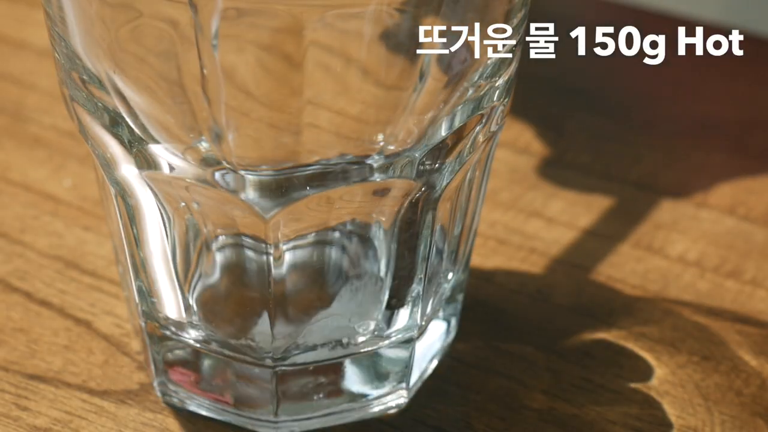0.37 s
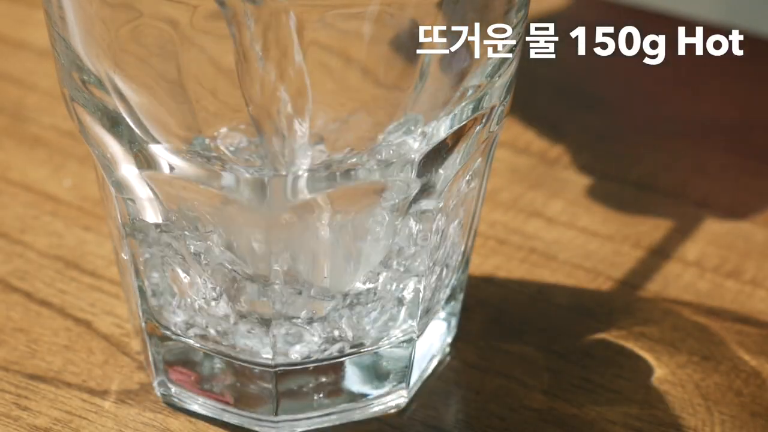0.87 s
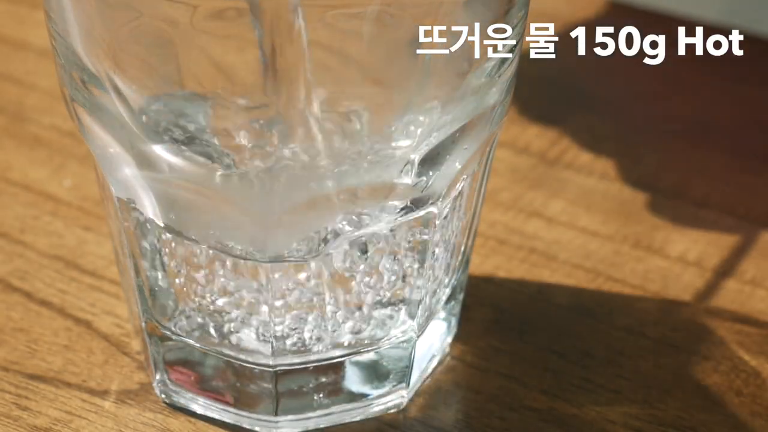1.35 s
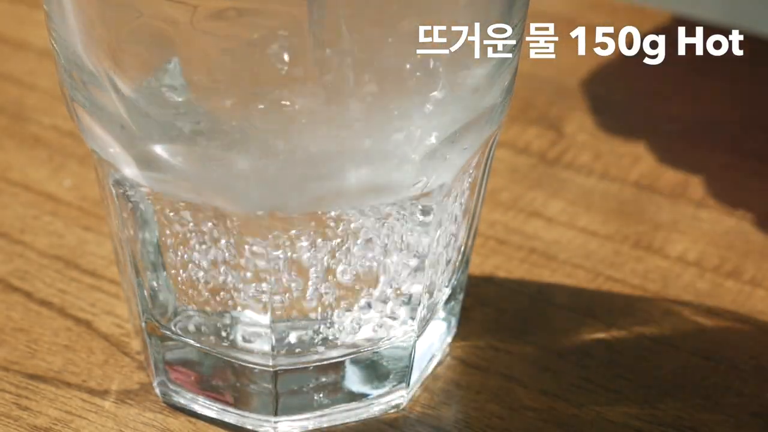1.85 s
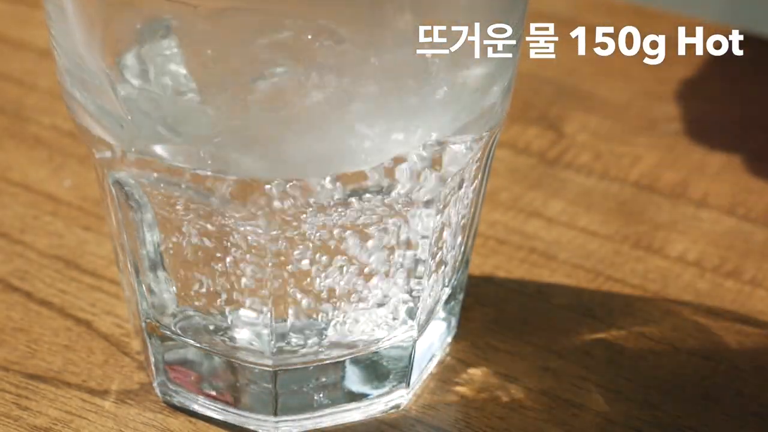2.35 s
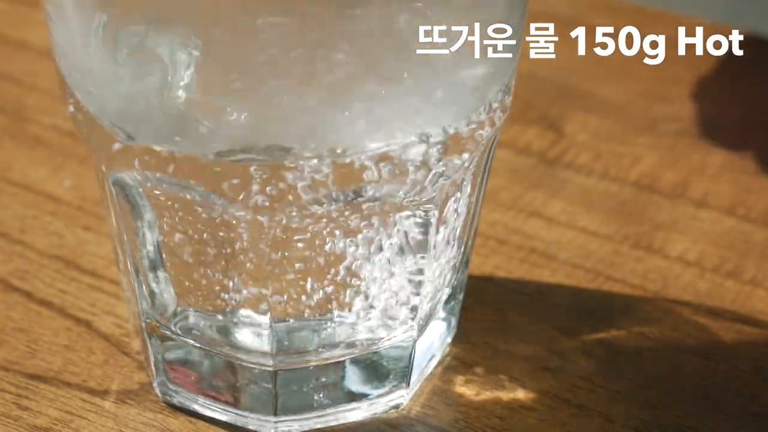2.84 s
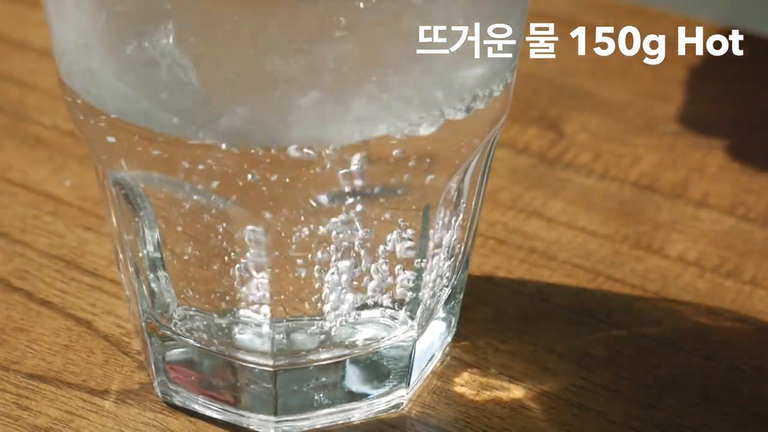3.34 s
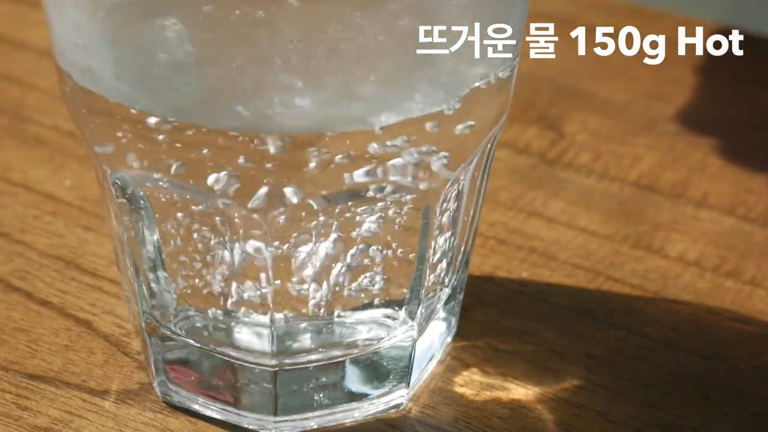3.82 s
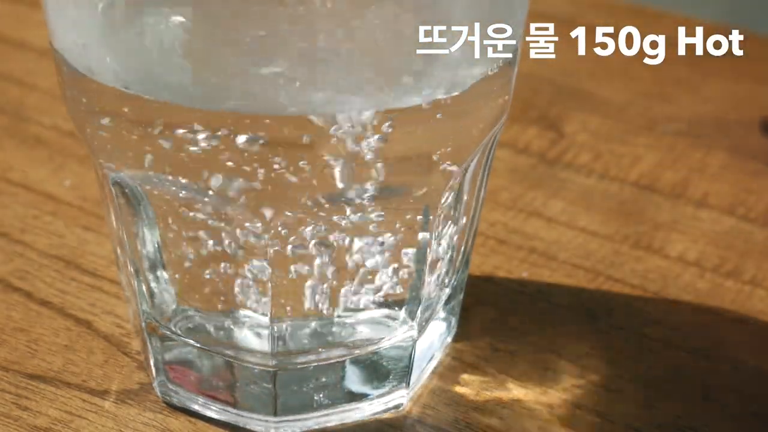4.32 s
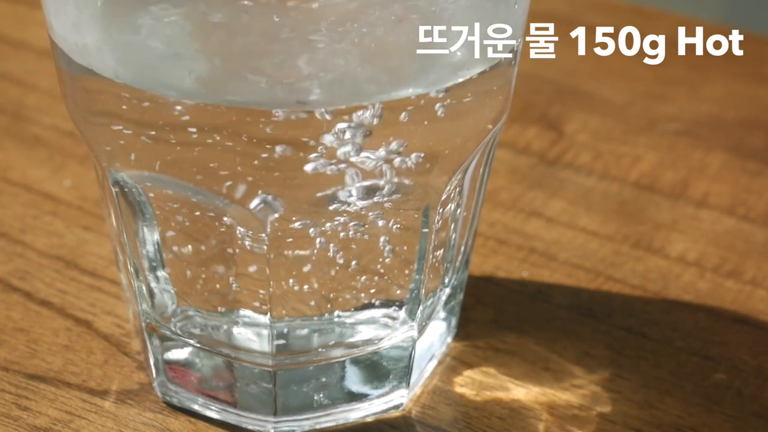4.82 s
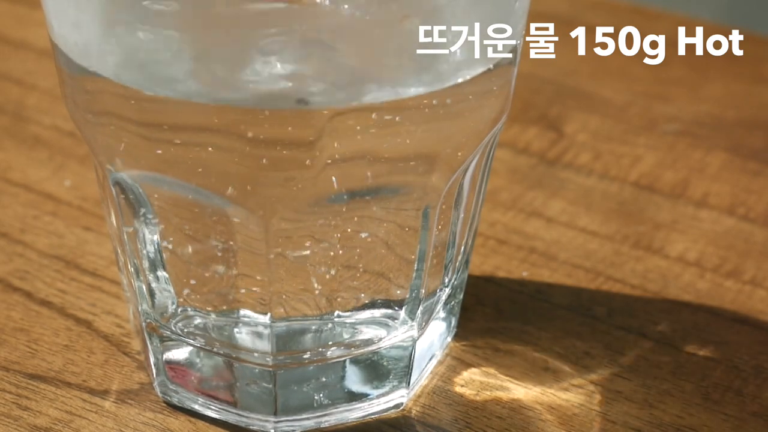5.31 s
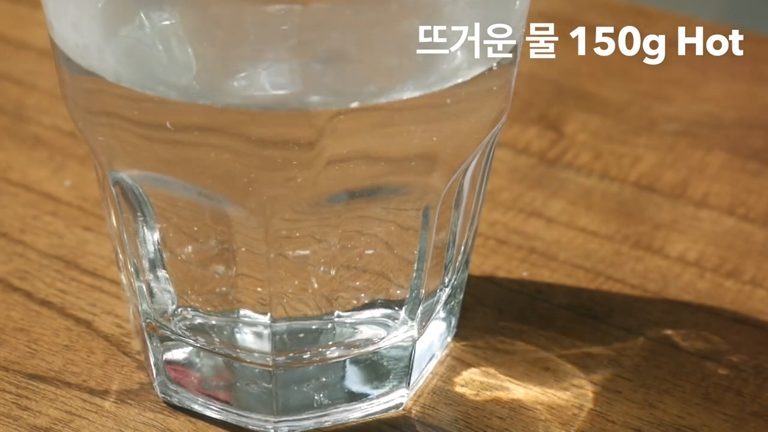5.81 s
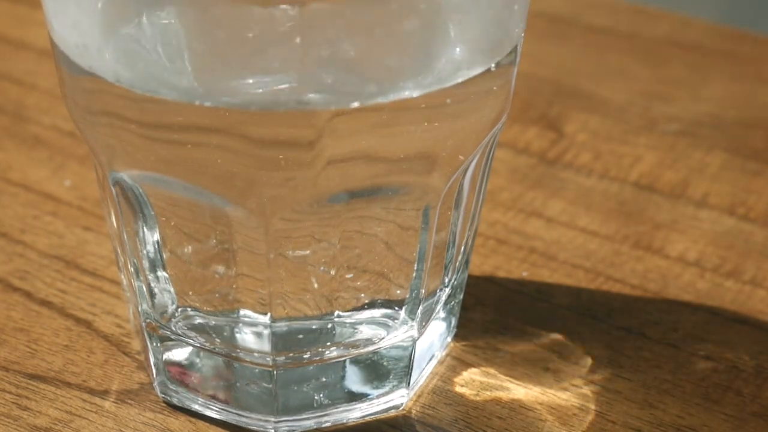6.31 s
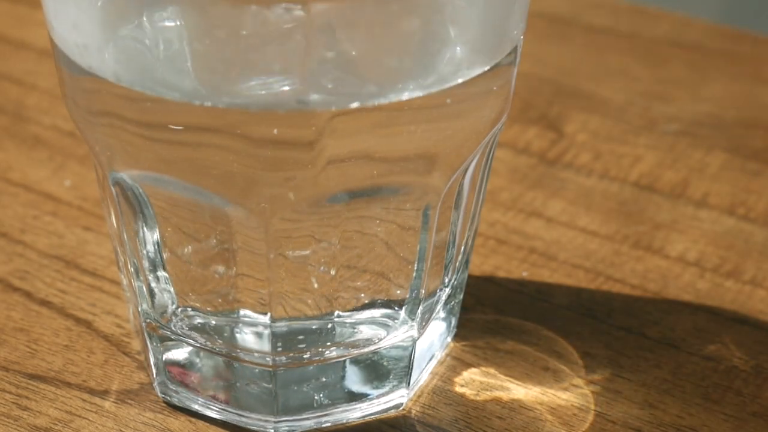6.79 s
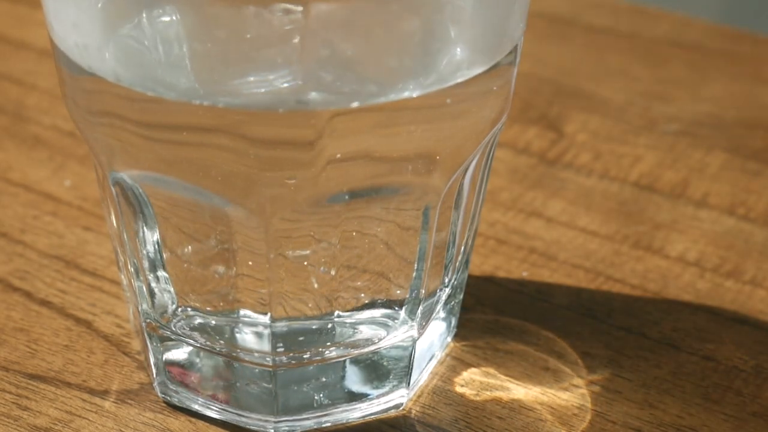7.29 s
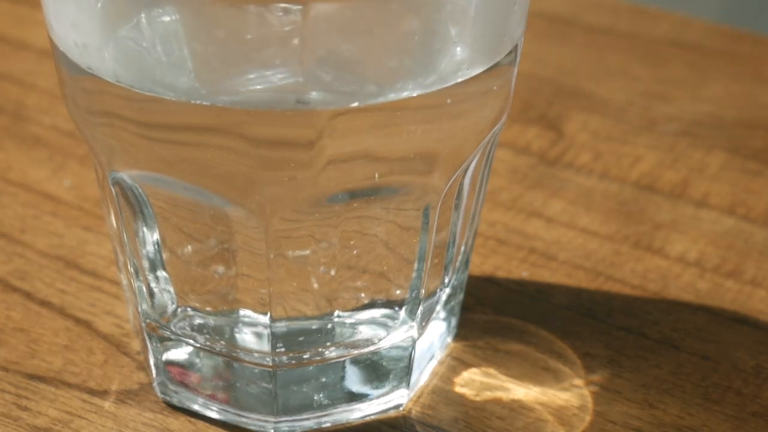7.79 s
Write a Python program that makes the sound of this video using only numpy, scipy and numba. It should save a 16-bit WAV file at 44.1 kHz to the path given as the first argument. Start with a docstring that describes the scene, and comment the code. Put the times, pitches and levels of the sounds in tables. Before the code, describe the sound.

Hot water splashes and glugs into a thick glass tumbler in two close pours, then stops, leaving last fizzing ticks and faint crickets outside.

```python
"""A wooden table near an open window: hot water is poured in two goes into a thick tumbler.
Air pockets glug, bubbles plop, drops and bursting froth tick, each a swelling, dying, gliding sine.
Resonators for table and glass ring along; a short noise tail is the room.
Outside, soft pitched strokes make crickets and a far animal; brief hums sound, and shaped noise is
the air's rumble and hiss."""
import sys
import numpy as np
from scipy import signal
from scipy.fft import rfft, irfft, next_fast_len
from scipy.io import wavfile
from numba import njit

SR = 44100
rng = np.random.default_rng(int(sys.argv[2]) if len(sys.argv) > 2 else 0)


def store_pcm(level_fs):
    """Save levels as 16-bit WAV."""
    pcm = np.round(np.clip(level_fs, -1, 1) * 32767).astype(np.int16)
    wavfile.write(sys.argv[1], SR, np.atleast_2d(pcm).T)


def magnitude_from_level(level_db):
    """Linear magnitude for a level in decibels (20 dB per decade)."""
    exponent = np.asarray(level_db, float) / 20
    return 10 ** exponent


N = 348825  # samples

# Levels are relative: each layer adds its own trim. Pitches are nominal.
# stream strength: t/s, glugging level/dB, bubbling level/dB, spray level/dB
STREAM = [(0.45, -94, -84.5, -77.5), (0.86, -66.5, -33.5, -36), (1.01, -27, -36, -43),
          (1.45, -39.5, -32, -52), (1.8, -58.5, -69, -65.5), (1.91, -36.5, -48, -50),
          (2.01, -45.5, -63.5, -63.5), (2.44, -51, -46.5, -56), (2.51, -20, -30, -33),
          (2.6, -34.5, -38, -43.5), (3.07, -32, -35, -46), (3.45, -53.5, -48, -50), (3.94, -78, -84, -66.5),
          (3.98, -30, -25, -40.5), (4.07, -61.5, -65, -60.5), (4.75, -57, -57, -56.5),
          (4.83, -33, -51.5, -64.5), (5.02, -91.5, -89, -61), (5.9, -85, -91, -85.5)]
# pitches as the glass fills: t/s, big pockets f/Hz, bubbles f/Hz, spray f/Hz, froth above spray level/dB
FILL = [(.5, 1040, 2580, 4860, -2.5), (.97, 1160, 2390, 4800, -18.5), (1.07, 890, 2200, 4730, -21),
        (1.45, 600, 2290, 3940, -20), (1.75, 582, 1645, 4420, -5.5), (2.4, 478, 1696, 5400, -15.5),
        (3.0, 452, 1916, 5550, -6.5), (3.6, 490, 2300, 5100, -10), (4.65, 481, 2290, 4780, -3.5),
        (4.8, 603, 1950, 4100, -5)]
# loud air pockets: t/s, level/dB, f/Hz
GLUGS = [(0.827, -28.5, 1030), (0.92, -29.5, 1070), (1, -24.5, 1160), (1.022, -22, 930),
         (1.046, -24.5, 723), (1.151, -34, 940), (1.168, -29, 1130), (1.202, -25.5, 1170),
         (1.294, -27.5, 895), (1.427, -36, 705), (1.47, -32, 630), (1.508, -30.5, 643), (1.57, -37, 510),
         (1.715, -45.5, 565), (2.144, -38, 510), (2.245, -36.5, 492), (2.28, -40.5, 517), (2.408, -29, 600),
         (2.47, -30.5, 395), (2.506, -16.5, 413), (2.617, -28.5, 385), (2.68, -30, 340), (2.703, -21, 378),
         (2.747, -30, 920), (2.839, -31, 388), (2.877, -31, 360), (2.95, -23.5, 387), (2.984, -26, 394),
         (3.037, -23, 399), (3.088, -26.5, 573), (3.17, -35.5, 365), (3.288, -37.5, 360),
         (3.328, -28.5, 372), (3.339, -35, 570), (3.403, -32.5, 354), (3.573, -36, 380), (3.668, -28, 380),
         (3.731, -36.5, 500), (3.763, -32, 401), (3.95, -37.5, 373), (3.974, -27, 383), (4.141, -46.5, 636),
         (4.17, -42, 517), (4.27, -44.5, 380), (4.358, -36.5, 495), (4.411, -44.5, 470),
         (4.571, -45.5, 360), (4.71, -37.5, 497), (4.773, -30.5, 630), (4.799, -26, 553), (4.875, -36, 650)]
# water knocking on the glass wall: t/s, level/dB
KNOCKS = [(0.829, -29), (1, -37), (1.151, -26.5), (1.203, -35), (2.504, -41), (2.703, -35.5), (2.984, -39),
          (3.668, -34.5), (4.798, -34.5)]
# loud bubbles: t/s, level/dB, f/Hz
PLOPS = [(0.587, -39.5, 2780), (0.596, -36.5, 2670), (0.602, -40.5, 2130), (0.6657, -38, 2930),
         (0.6802, -36.5, 2430), (0.721, -38.5, 2610), (0.7307, -36.5, 2540), (0.753, -32, 2560),
         (0.767, -38.5, 2710), (0.7792, -37.5, 2300), (0.793, -35, 2500), (0.8074, -18.5, 2150),
         (0.819, -34, 1960), (0.8287, -41.5, 2990), (0.851, -37.0, 1850), (0.859, -30, 2520),
         (0.9, -39, 2450), (0.921, -30.5, 2550), (0.93, -33, 2720), (0.9606, -24.5, 2110),
         (0.975, -30.5, 2910), (1.003, -35, 2430), (1.0172, -41, 2320), (1.0556, -36.5, 2070),
         (1.057, -36.5, 1310), (1.103, -35, 2090), (1.1406, -39.5, 1850), (1.1765, -34.5, 2200),
         (1.1764, -33, 1310), (1.184, -34.5, 2240), (1.202, -30.5, 2580), (1.2516, -35.5, 2500),
         (1.2796, -35.5, 2500), (1.2987, -28.5, 2610), (1.3505, -40.5, 1820), (1.397, -45, 2620),
         (1.4244, -48, 2520), (1.4317, -34.5, 2690), (1.4424, -42.5, 2220), (1.464, -36.5, 2560),
         (1.4825, -41.5, 2110), (1.504, -41.5, 1920), (1.5204, -45, 2350), (1.612, -41, 1310),
         (1.824, -54.5, 1850), (1.8954, -46, 1810), (1.9127, -44, 1830), (1.926, -45, 2130),
         (1.934, -47, 2410), (1.9793, -51, 2260), (1.994, -53, 3150), (2.0026, -51, 2350),
         (2.086, -53.5, 2200), (2.1006, -43.5, 2020), (2.142, -45, 1740), (2.15, -44.5, 1680),
         (2.2024, -44.5, 2860), (2.228, -43.5, 1680), (2.2388, -39, 2050), (2.2758, -40, 1740),
         (2.2882, -41.5, 2200), (2.2977, -40.5, 2150), (2.3648, -40.5, 1660), (2.4042, -31, 1640),
         (2.4146, -43.5, 1570), (2.426, -37, 1850), (2.468, -30, 2050), (2.491, -32.5, 2910),
         (2.502, -29.5, 1550), (2.517, -43.5, 1530), (2.5306, -34, 1530), (2.566, -44.5, 1770),
         (2.615, -36, 1680), (2.65, -35.5, 1830), (2.677, -35.5, 1640), (2.6993, -25.5, 1610),
         (2.7222, -39, 1720), (2.746, -30.5, 1810), (2.762, -36, 1740), (2.776, -38.5, 1550),
         (2.807, -37.5, 1530), (2.818, -32.5, 1680), (2.8374, -27, 1610), (2.848, -37, 1610),
         (2.8595, -29, 1810), (2.8605, -30, 3270), (2.873, -41.5, 1660), (2.9045, -32, 1720),
         (2.9145, -32.5, 1700), (2.9456, -34, 1610), (2.9579, -29, 1810), (2.9856, -32.5, 1680),
         (3.014, -32, 2990), (3.033, -30, 1700), (3.0341, -30, 2610), (3.0877, -41, 1790),
         (3.1272, -41, 1700), (3.1552, -33, 1790), (3.1668, -33, 1590), (3.2368, -37.5, 1720),
         (3.244, -37.5, 2520), (3.2844, -30, 1850), (3.2886, -36.5, 3230), (3.3364, -30.5, 2210),
         (3.3426, -31, 1640), (3.3876, -39, 2070), (3.3916, -27.5, 3120), (3.4011, -35, 1810),
         (3.419, -39, 2530), (3.4578, -33, 2020), (3.4907, -37.5, 2930), (3.492, -36.5, 3620),
         (3.5646, -34.5, 2260), (3.5693, -37, 1810), (3.5937, -40, 2630), (3.607, -42, 2300),
         (3.6273, -41, 2220), (3.6416, -36, 2150), (3.666, -28, 2670), (3.6667, -34, 1680),
         (3.678, -38.5, 1460), (3.7356, -39, 2150), (3.7608, -44.5, 2910), (3.762, -31, 2130),
         (3.796, -50.5, 3200), (3.826, -47, 2750), (3.8501, -31.5, 1640), (3.871, -39, 2300),
         (3.925, -35.5, 2900), (3.9483, -25.5, 1680), (3.9592, -37, 1490), (3.972, -23.5, 2520),
         (3.9723, -20, 2000), (3.9831, -36, 2970), (3.9842, -39.5, 2130), (3.9922, -32, 2220),
         (4.0482, -42, 2900), (4.137, -45, 3530), (4.1362, -39.5, 1970), (4.1375, -38, 2780),
         (4.168, -37, 2050), (4.189, -48, 2100), (4.1958, -38, 3100), (4.2104, -43, 2150),
         (4.2225, -40, 2130), (4.239, -47.5, 2100), (4.2694, -32, 2170), (4.302, -31.5, 3190),
         (4.304, -30.5, 2330), (4.3105, -37.5, 1700), (4.339, -31.5, 2500), (4.3532, -27, 1940),
         (4.4082, -42, 1680), (4.419, -46.5, 2550), (4.437, -38, 2090), (4.4626, -43.5, 1890),
         (4.474, -37, 2730), (4.503, -48, 1950), (4.532, -47, 2450), (4.544, -38.5, 2020),
         (4.5576, -30, 2260), (4.563, -31.5, 2480), (4.5702, -33.5, 3040), (4.5797, -37, 2300),
         (4.578, -38.5, 1740), (4.5912, -31.5, 2130), (4.6008, -38, 3600), (4.6555, -33, 2150),
         (4.7048, -26.5, 1680), (4.7155, -34.5, 1490), (4.7305, -44.5, 1660), (4.7992, -21.5, 1660),
         (4.809, -41.5, 2520), (4.8491, -30, 1890), (4.8732, -29.5, 2260), (4.8974, -40, 2730),
         (4.9241, -39, 2390), (4.961, -44, 1790)]
# drops landing: t/s, level/dB, f/Hz
DROPS = [(0.5001, -38.5, 4820), (0.6666, -42.5, 4460), (0.6894, -30, 4430), (0.8155, -35.5, 5200),
         (0.8903, -45, 4800), (0.9189, -27.5, 4930), (1.0807, -31.5, 4200), (1.3038, -33, 4000),
         (1.3286, -32.5, 4030), (1.47, -37, 4100), (1.662, -47, 5310), (1.887, -48, 5500),
         (2.025, -50, 4400), (2.4056, -34, 5260), (2.4288, -31.5, 5220), (2.4498, -32, 5420),
         (2.489, -33, 5300), (2.5042, -32, 6200), (2.617, -34, 5050), (2.6697, -31, 7350),
         (2.7471, -37.5, 5340), (2.807, -30, 5430), (2.8604, -34.5, 6400), (2.9472, -33, 6200),
         (3.007, -34.5, 6990), (3.035, -27.5, 6180), (3.1682, -35, 6080), (3.2968, -36, 6480),
         (3.3916, -38.5, 4920), (3.4932, -32.5, 4150), (3.5653, -40.5, 4470), (3.6667, -33.5, 5130),
         (3.7267, -33.5, 5400), (3.7613, -43.5, 6030), (3.9494, -33, 5020), (3.9715, -34, 4200),
         (4.0823, -47, 5330), (4.1809, -42, 5400), (4.2422, -41, 6500), (4.2981, -33, 6230),
         (4.418, -47, 4250), (4.533, -47, 3850), (4.57, -42.5, 5100), (4.5962, -35, 4030),
         (4.6546, -33.5, 4130), (5.5192, -47, 6070), (5.6265, -42, 5700), (5.8052, -42.5, 7230)]
# froth bursting: t/s, level/dB, f/Hz
BURSTS = [(0.3013, -41.5, 9700), (0.636, -35, 9200), (0.78, -40, 9700), (0.9294, -44, 10100),
          (0.9612, -33, 8500), (1.4765, -43, 8440), (1.6862, -49, 9400), (2.026, -53, 9200),
          (2.279, -47, 9300), (2.405, -47, 9900), (2.4897, -33.5, 8300), (2.8086, -32.5, 8060),
          (2.859, -32.5, 8450), (2.905, -31, 8700), (2.9488, -17.5, 8800), (3.014, -32.5, 9500),
          (3.0358, -20.5, 8800), (3.0549, -29, 8420), (3.168, -33, 9400), (3.2087, -44, 9600),
          (3.285, -47, 8650), (3.319, -35, 8700), (3.39, -30, 9100), (3.4604, -31, 10300),
          (3.49, -27.5, 10300), (3.6447, -33, 10740), (3.6674, -32.5, 10300), (3.729, -29.5, 9100),
          (3.7609, -27.5, 9350), (3.95, -36, 8550), (3.9729, -33, 10200), (4.022, -35.5, 9400),
          (4.1333, -40, 9900), (4.2424, -43.5, 9900), (4.2688, -52, 9800), (4.296, -30, 9160),
          (4.3355, -34, 8650), (4.3549, -30.5, 9430), (4.5702, -42, 8600), (4.6062, -37, 9900),
          (4.636, -36.5, 9700), (4.657, -34.5, 8500), (4.7994, -40.5, 8900), (5.0046, -42.5, 9520),
          (5.408, -43.5, 9830), (5.48, -47.5, 8700), (5.5858, -44, 9080), (5.8062, -43, 9000)]
# table top and tumbler modes: f/Hz, level/dB, t60/s, left minus right level/dB
BODY_MODES = [(200, -13, 0.24, 4.5), (271.2, -4, 0.082, -2), (358, -5.5, 0.042, -12), (495, -6, 0.3, -14),
              (560.7, -4, 0.12, 1), (623.8, -5.5, 0.099, 7.5), (1030, -5, 0.26, 1.5),
              (1480, -5, 0.58, -2.4), (1970, -23.5, .4, -3), (2534, -11.5, 0.22, 0)]
# low hum or the glass singing, soft notes: t/s, level/dB, f/Hz, length/s
HUMS = [(0.954, -50.5, 200, 0.096), (1.445, -53.5, 200, 0.085), (1.486, -55, 1340, 0.086),
        (1.559, -56, 1300, 0.086), (4.6, -56.5, 194, 0.19)]
# nearest cricket's trills: t/s, strokes/count
TRILLS = [(.005, 11), (0.602, 10), (1.27, 8), (1.848, 12), (5.31, 9), (6.002, 9), (6.795, 8), (7.477, 9)]
# neighbours' trills: t/s, strokes/count, f/Hz
NEIGHBOURS = [(.3, 9, 6900), (2.0, 9, 6700), (6.05, 4, 6400), (6.385, 6, 7300), (6.99, 8, 6250),
              (7.165, 7, 6400), (7.55, 3, 6450), (7.7, 6, 6900), (7.77, 6, 6100)]
# low cricket's phrases, by last chirp: t/s, chirps/count, level/dB, f/Hz
CHIRPS = [(0.628, 2, -66, 3950), (3.872, 1, -69, 3950), (2.246, 3, -57.5, 3850), (5.1782, 3, -61, 3940),
          (5.9085, 3, -70.5, 3940), (6.4153, 2, -61.5, 3960), (6.76, 2, -70, 4140), (6.845, 1, -68, 4130),
          (7.467, 2, -69, 4130), (7.805, 4, -67, 3920)]
# far animal calls: t/s, level/dB, f/Hz, length/s
FAR_CALLS = [(3.876, -65, 770, 0.15), (4.47, -59, 758, 0.051), (5.244, -61.5, 658, 0.073),
             (5.643, -55.5, 714, 0.058), (6.285, -55, 676, 0.056), (7.185, -53, 729, 0.052),
             (7.601, -53, 698, 0.083)]
# air spectrum shape: f/Hz, level/dB per Hz
AIR_SPECTRUM = [(15, -38), (25, -11), (70, 2), (95, 0.4), (217, -13), (1260, -20), (3250, -40), (4700, -27),
                (5880, -23), (7110, -27), (7920, -44), (9570, -35), (10700, -42), (12200, -36),
                (16000, -39)]
# left-right correlation of the air: f/Hz, correlation/1
AIR_LIKENESS = [(25, 0.94), (60, 0.98), (290, 0.57), (1400, 0.27), (3100, 0.36), (6800, 0.44),
                (15000, -0.62)]


def sides(pan_db):
    """Left and right gains; pan is left minus right."""
    return magnitude_from_level(np.array([pan_db, -pan_db]) / 2)


@njit
def rings(rows, size):
    """Sines that swell softly, die and glide; swell and 1/e ring in cycles, glide as share per ring."""
    out = np.zeros((2, size))
    for k in range(len(rows)):
        start_s, left, right, hz, swell, ring, glide, phase = rows[k]
        start, step = int(start_s * SR), hz / SR
        z = np.exp(2j * np.pi * phase)
        turn = np.exp(2j * np.pi * step)
        bend = np.exp(2j * np.pi * glide * step * step / ring)
        fade = np.exp(-step / ring)
        for i in range(min(int((swell + 6 * ring) / step), size - start)):
            u = i * step / swell
            turn *= bend
            z *= turn / bend
            if u >= 1:
                z *= fade
            v = z.imag * (u * u * (3 - 2 * u) if u < 1 else 1.)
            out[0, start + i] += left * v
            out[1, start + i] += right * v
    return out


def bubbles(s, db, hz, pan_db, swell, ring, glide):
    """Each bubble rings at its own pitch; near the surface the pitch moves."""
    pan_db = np.clip(pan_db, -8, 8) + 0 * s
    left, right = magnitude_from_level(db) * sides(pan_db)
    hz = np.clip(hz, 100, SR / 3)
    ring = np.maximum(ring, .3) + 0 * s
    phase = rng.random(len(s))
    return rings(np.c_[s, left, right, hz, swell + 0 * s, ring, glide + 0 * s, phase], N)


def brood(s, db, hz, count, late, octaves, wide_db, swell, ring, glide):
    """A burst throws off smaller bubbles around its pitch, on average fainter the later they come."""
    s, db, hz = (np.repeat(v, count) for v in (s, db, hz))
    wait = rng.exponential(size=len(s))
    g = rng.standard_normal((4, len(s)))
    s = s + .002 + late * wait
    db = db - 5 * wait + 3 * g[0]
    hz = hz * 2 ** (octaves * g[1])
    return bubbles(s, db, hz, wide_db * g[2], swell, ring * 2 ** (.5 * g[3]), glide)


def swarm(db, hz, count, octaves, scatter_db, wide_db, swell, ring, glide):
    """Many small bubbles at chance moments, a few much louder, on the stream's level."""
    times = np.array(STREAM)[:, 0]
    s = rng.uniform(times[0], times[-1], count)
    g = rng.standard_normal((3, count))
    event_db = np.interp(s, times, db) - scatter_db * np.log(.03 + rng.random(count))
    pitch_hz = np.interp(s, np.array(FILL)[:, 0], hz) * 2 ** (octaves * g[0])
    return bubbles(s, event_db, pitch_hz, wide_db * g[1], swell, ring * 2 ** (.5 * g[2]), glide)


def strokes(s, db, hz, pan_db, length_s, fall):
    """Wing strokes and calls: soft notes whose pitch starts high and falls by a share."""
    cycles = length_s * hz
    return bubbles(s, db, hz * (1 + fall / 2), pan_db, 0.75 * cycles, 0.21 * cycles, -.18 * fall)


def glugs():
    """Big air pockets ring low, tear and throw off smaller ones, at chance pans."""
    s, db, hz = np.transpose(GLUGS)
    pan_db = 12.5 * rng.standard_normal(len(s))
    out = bubbles(s - .001, db - 8, hz, pan_db, swell=0.72, ring=0.0048 * hz, glide=0.0079)
    out += brood(s, db - 11.5, 1.17 * hz, count=4, late=.018, octaves=0.3, wide_db=8.5,
                 swell=0.64, ring=2.16, glide=0.013)
    # the pocket tears
    out += brood(s - .003, db - 16, 1.55 * hz, count=3, late=0.0065, octaves=0.22, wide_db=1.5,
                 swell=0.81, ring=1.5, glide=0.0193)
    return out


def knocks():
    """Water hits the glass wall: short dull notes."""
    s, db = np.transpose(KNOCKS)
    return bubbles(s, db, np.full_like(s, 1030), 0, swell=2.7, ring=2.4, glide=0.02)


def plops():
    """Bubbles ring and crack as they pinch off, with broods and thrown-up spatter."""
    s, db, hz = np.transpose(PLOPS)
    big = np.clip((db + 44.5) / 22, 0, 1)  # 0 faint, 1 loudest
    rise = .045 * rng.random(len(s))
    s = s + .0012 * big  # big ones snap late and hard
    direct = bubbles(s, db + 0.5, 0.9775 * hz, 0, swell=4.2 - 2.6 * big, ring=6.5 - 2.3 * big, glide=rise)
    # pinch-off crack, far harder in big bubbles
    direct += bubbles(s, db - 13.5 + 16 * big, 1.2 * hz, 0, swell=1.3, ring=2.2, glide=-0.038)
    # small bubbles radiate no bass
    out = signal.sosfilt(signal.butter(8, 1380, "high", fs=SR, output="sos"), direct)
    out += brood(s, db - 16, 1.2 * hz, count=5, late=.014, octaves=.3, wide_db=0.5,
                 swell=3.2, ring=7.5, glide=0.065)
    # spatter: droplets thrown up by each bubble
    out += brood(s - .002, db - 22, np.full_like(s, 7580), count=8, late=.0025, octaves=.5, wide_db=9,
                 swell=1.7, ring=6.8, glide=0.01)
    return out


def drops():
    """Landing drops tick at a high pitch and scatter smaller ticks."""
    s, db, hz = np.transpose(DROPS)
    out = bubbles(s, db + .1, hz, 0, swell=3.1, ring=6.1, glide=-0.012)
    out += brood(s, db - 15.5, hz, count=20, late=0.013, octaves=0.21, wide_db=10.5,
                 swell=0.95, ring=8.6, glide=-.02)
    return out


def froth_bursts():
    """Froth bursts: a tick, the film's snap and a brood."""
    s, db, hz = np.transpose(BURSTS)
    out = bubbles(s - .0002, db + 3.5, hz, 0, swell=4.4, ring=3.6, glide=0.016)
    # the film snaps
    out += bubbles(s, db - 11, np.full_like(s, 11500), 0, swell=4.5, ring=2.4, glide=-0.012)
    out += brood(s, db - 15.5, hz, count=24, late=.011, octaves=0.22, wide_db=13.5,
                 swell=1.4, ring=4, glide=-0.027)
    return out


def stream():
    """Swarms of four bubble sizes follow the stream's level and the filling glass."""
    times, glug_db, plop_db, spray_db = np.transpose(STREAM)
    filled, glug_hz, plop_hz, spray_hz, froth_over_db = np.transpose(FILL)
    froth_db = spray_db + np.interp(times, filled, froth_over_db)
    out = swarm(glug_db - 17.5, glug_hz, count=2000, octaves=.26, scatter_db=1, wide_db=11.5,
                swell=0.43, ring=2.6, glide=0.025)
    out += swarm(plop_db - 21, plop_hz, count=2400, octaves=0.2717, scatter_db=5.5, wide_db=1.5,
                 swell=3.1, ring=4.9, glide=0.044)
    out += swarm(spray_db - 15.5, spray_hz, count=5000, octaves=.22, scatter_db=5.5, wide_db=9.5,
                 swell=0.75, ring=3.6, glide=0.032)
    out += swarm(froth_db - 12.5, np.full_like(filled, 8830), count=3500, octaves=0.16, scatter_db=7.5,
                 wide_db=10, swell=2, ring=16.2, glide=0.00031)
    return out


def water():
    """Loud single events over the stream's swarms."""
    return glugs() + knocks() + plops() + drops() + froth_bursts() + stream()


def body(x):
    """Table and tumbler ring on after every blow of the water: two-pole resonators."""
    out, blows = 0, x.mean(axis=0)
    for hz, db, t60_s, pan_db in BODY_MODES:
        r = np.exp(-np.log(1000) / (t60_s * SR))
        poles = [1, -2 * r * np.cos(2 * np.pi * hz / SR), r * r]
        ring = signal.lfilter([1 - r, 0, r - 1], poles, blows)
        out = out + 3.43 * magnitude_from_level(db) * sides(pan_db)[:, None] * ring
    return out


def room(x):
    """A short diffuse tail, unrelated left and right, building up over a few ms."""
    t60_s, build_s, tail_db = 0.2, 0.0066, -13.5
    t = np.arange(SR // 2) / SR
    envelope = 1000. ** (-t / t60_s) * (1 - np.exp(-t / build_s))
    tail = rng.standard_normal((2, len(t))) * envelope
    tail = signal.lfilter([1], [1, -.6], tail)  # soft walls take the treble
    tail *= magnitude_from_level(tail_db) / np.sqrt(np.sum(tail ** 2) / 2)
    return signal.fftconvolve(x.mean(axis=0)[None], tail, axes=1)[:, :N]


def hum():
    """Soft notes of nearly steady pitch."""
    s, db, hz, length_s = np.transpose(HUMS)
    return strokes(s, db, hz, 0, length_s, fall=0.014)


def trill(s, count, hz, db, pan_db):
    """One row for each stroke of a trill."""
    stroke_rate_hz = 61.7
    return [(s + k / stroke_rate_hz, db, hz, pan_db) for k in range(round(count))]


def trilling_crickets():
    """Trills of quick wing strokes: the nearest, its neighbours and a faint high timekeeper."""
    rows = []
    for s, count in TRILLS:
        rows += trill(s, count, hz=7490, db=-63.5, pan_db=2)
    for s, count, hz in NEIGHBOURS:
        rows += trill(s, count, hz, db=-68.5, pan_db=11)
    for s in np.arange(0.18, N / SR - .1, 0.4):
        rows += trill(s, 6, hz=12600, db=-79.5, pan_db=0)
    return strokes(*np.transpose(rows), length_s=0.0138, fall=0.06)


def chirping_cricket():
    """Phrases of falling chirps, each louder and higher than the one before."""
    gap_s, grow_db, rise_hz, pan_db = .067, 4, 54.7, -4  # from chirp to chirp
    rows = []
    for last_s, count, db, hz in CHIRPS:
        for k in range(round(count)):
            rows.append((last_s - k * gap_s, db - k * grow_db, hz - k * rise_hz))
    s, db, hz = np.transpose(rows)
    # the pitch holds, then drops
    out = strokes(s - .006, db - 0.5, 1.015 * hz, pan_db, length_s=0.013, fall=.02)
    out += strokes(s + 0.0024, db + 0.45, 0.992 * hz, pan_db, length_s=0.019, fall=0.12)
    return out


def far_crickets():
    """A steady chirper and two endless far trills, each stroke slightly uneven."""
    out = 0
    # f/Hz, stroke rate/Hz, level/dB, left minus right level/dB, length/s
    for hz, rate_hz, db, pan_db, length_s in [(5930, 12, -69, -10, 0.029), (4800, 60.5, -72.5, 8, 0.01),
                                              (6400, 63, -70, -6, 0.012)]:
        s = .05 + np.arange(-1, rate_hz * N / SR) / rate_hz
        g = rng.standard_normal((3, len(s)))
        s = np.abs(s + 0.00087 * g[0])
        out = out + strokes(s, db + 3 * g[1], hz * (1 + 0.021 * g[2]), pan_db, length_s, fall=0.097)
    return out


def far_animal():
    """Short hoarse notes, blurred by distance: a tone with a rough edge."""
    s, db, hz, length_s = np.transpose(FAR_CALLS)
    out = strokes(s - length_s / 2, db + 0.5, hz, 3.9, length_s, fall=0.06)
    out += brood(s - .07, db - 13, .95 * hz, count=24, late=.06, octaves=.14, wide_db=5,
                 swell=16, ring=5, glide=-.01)
    return out


def air():
    """Rumble and hiss: shaped noise, its bass nearly the same left and right."""
    rms_db = -60
    size = next_fast_len(N)
    log_f = np.log(np.maximum(np.fft.rfftfreq(size, 1 / SR), 1))
    shape_hz, shape_db = np.transpose(AIR_SPECTRUM)
    like_hz, like = np.transpose(AIR_LIKENESS)
    gain = magnitude_from_level(np.interp(log_f, np.log(shape_hz), shape_db))
    like = np.clip(np.interp(log_f, np.log(like_hz), like), -.95, .95)
    noise = rfft(rng.standard_normal((2, size))) * gain
    mid, side = noise * np.sqrt(1 + np.outer([1, -1], like))
    out = irfft(np.array([mid + side, mid - side]), size)[:, :N]
    return out * magnitude_from_level(rms_db) / np.sqrt(np.mean(out ** 2))


def scene():
    """The glass close by, its room, and the garden behind."""
    near = water()
    near = near + body(near)
    outside = trilling_crickets() + chirping_cricket() + far_crickets() + far_animal()
    return near + room(near) + hum() + outside + air()


def top_cut(x):
    """Nothing passes above the cut-off."""
    return signal.sosfilt(signal.butter(12, 16510, fs=SR, output="sos"), x)


def record(dry):
    """A small camera's microphones dull the top: low-pass at 14 kHz."""
    mix = signal.sosfilt(signal.butter(2, 14000, fs=SR, output="sos"), dry)
    return top_cut(mix)


dry = scene()
out = record(dry)
store_pcm(out)
```